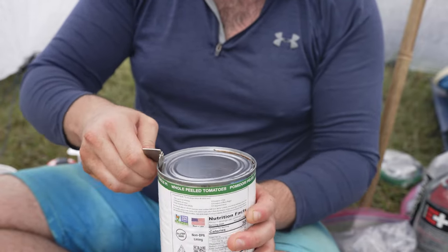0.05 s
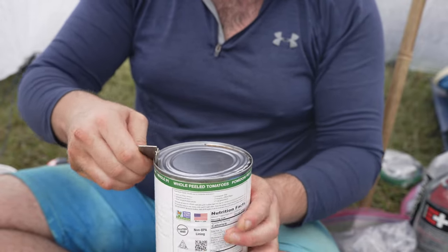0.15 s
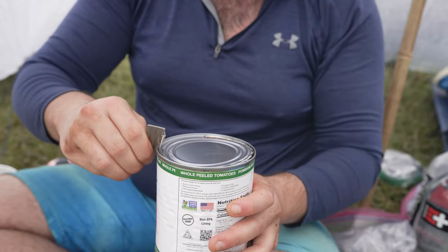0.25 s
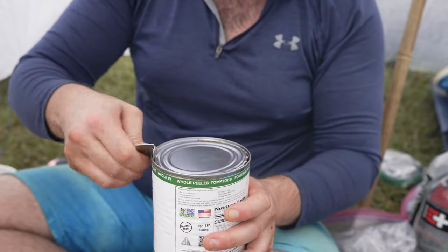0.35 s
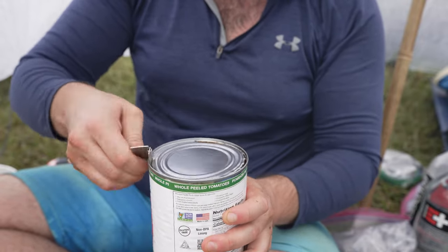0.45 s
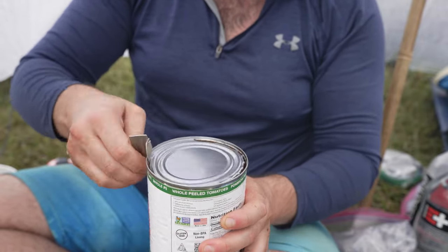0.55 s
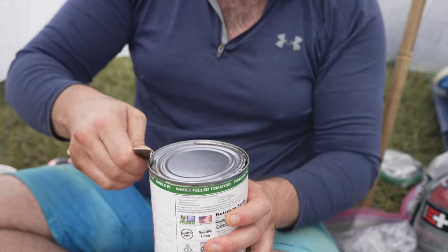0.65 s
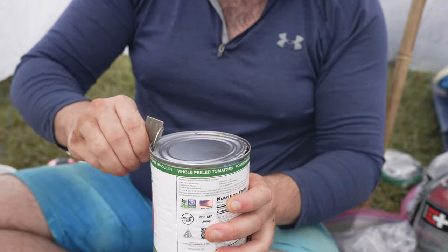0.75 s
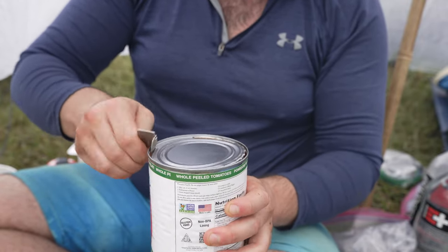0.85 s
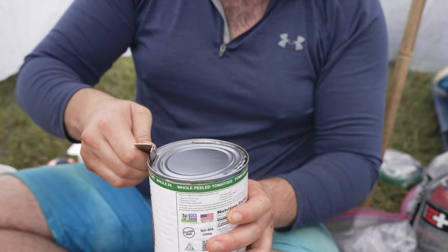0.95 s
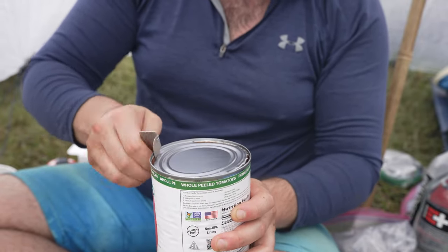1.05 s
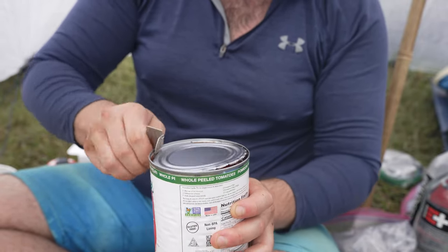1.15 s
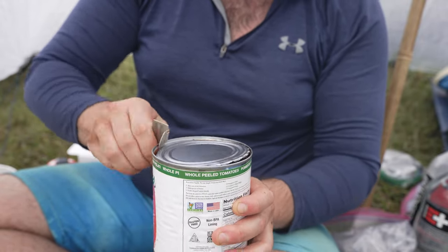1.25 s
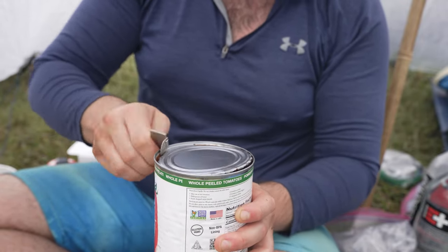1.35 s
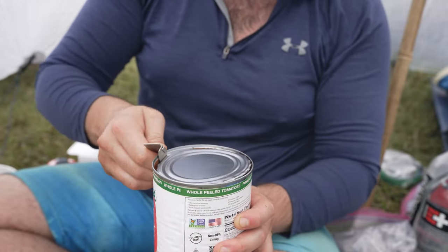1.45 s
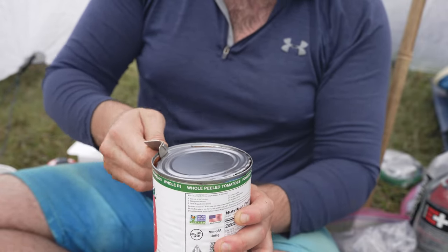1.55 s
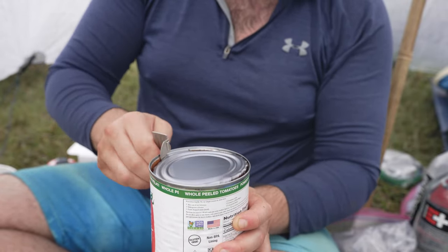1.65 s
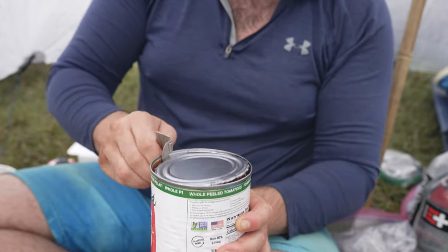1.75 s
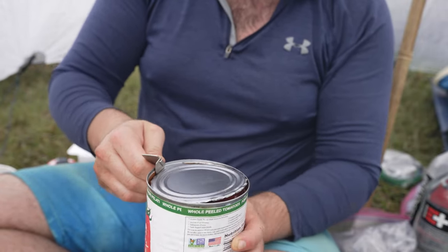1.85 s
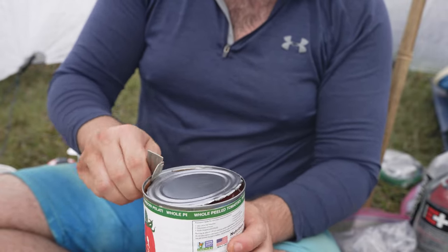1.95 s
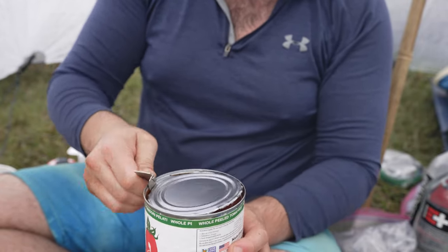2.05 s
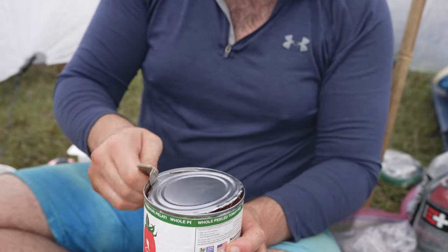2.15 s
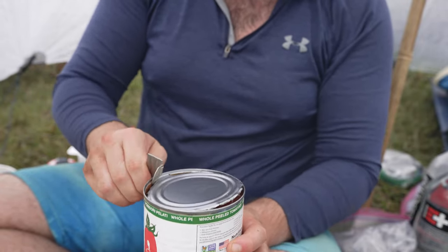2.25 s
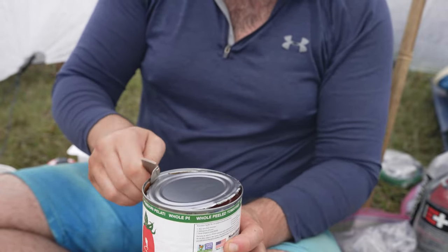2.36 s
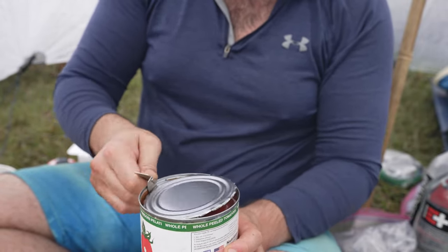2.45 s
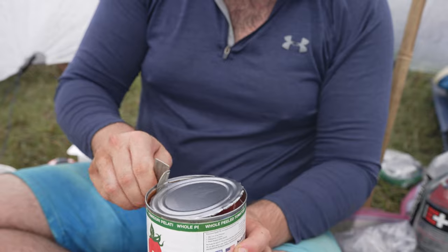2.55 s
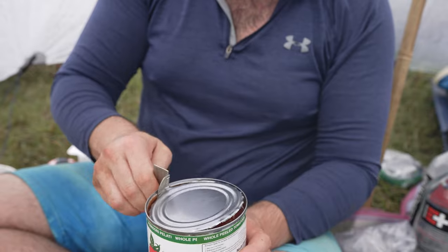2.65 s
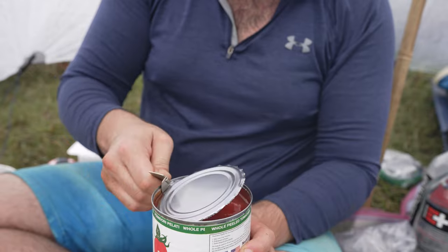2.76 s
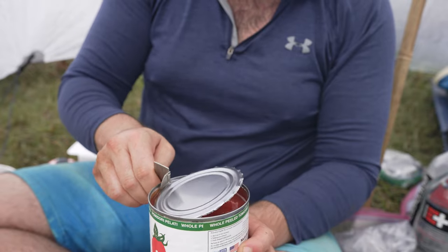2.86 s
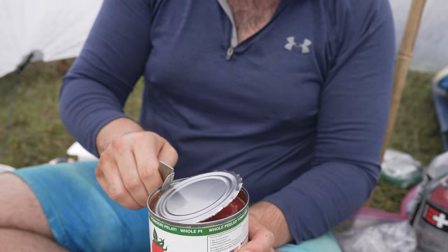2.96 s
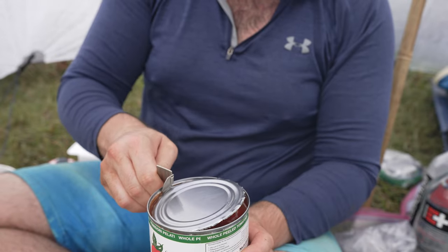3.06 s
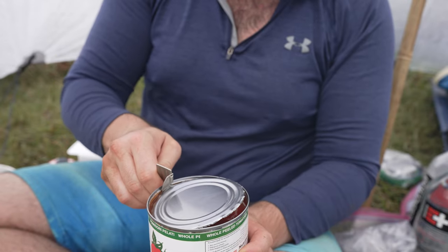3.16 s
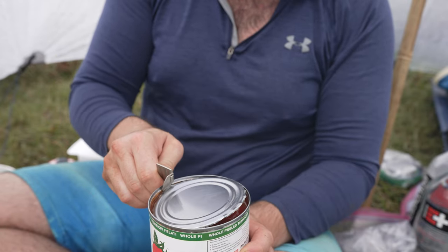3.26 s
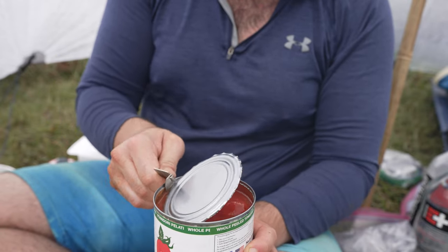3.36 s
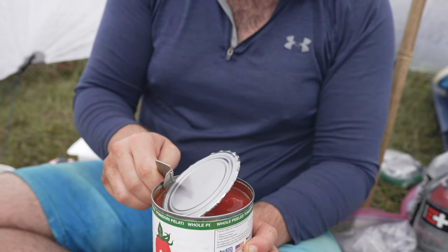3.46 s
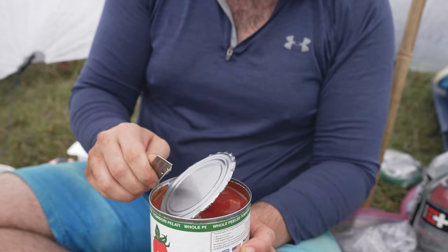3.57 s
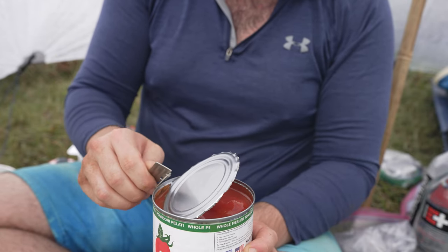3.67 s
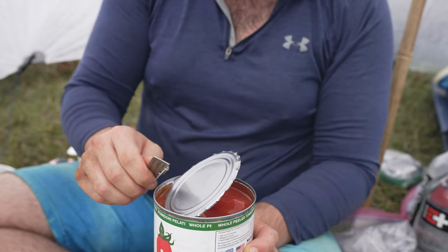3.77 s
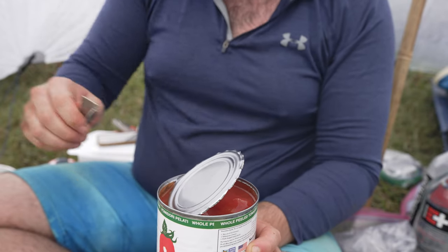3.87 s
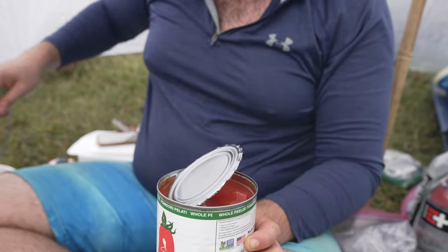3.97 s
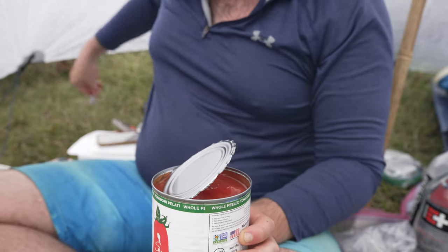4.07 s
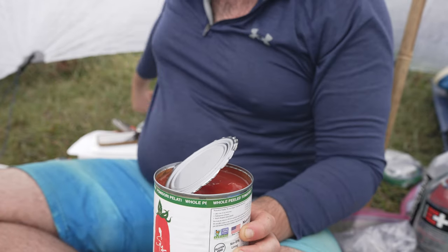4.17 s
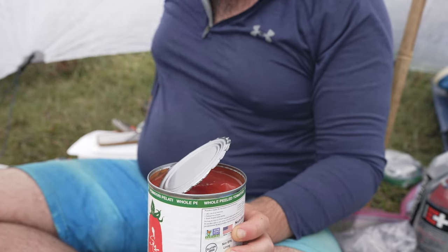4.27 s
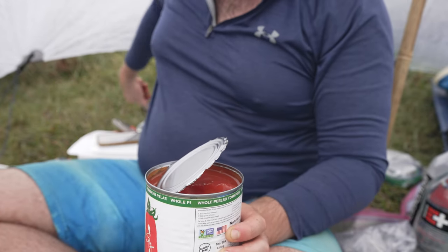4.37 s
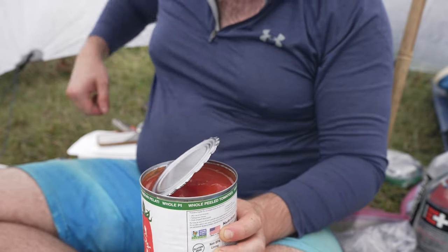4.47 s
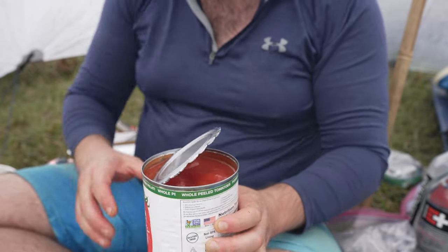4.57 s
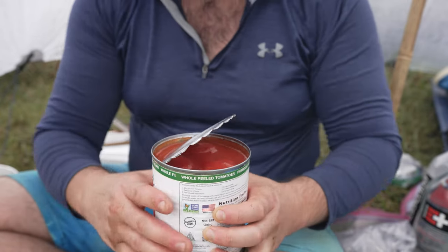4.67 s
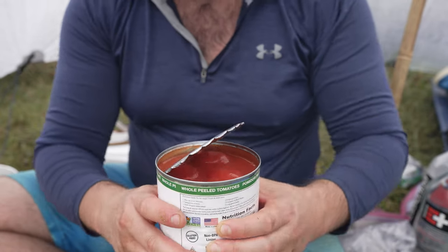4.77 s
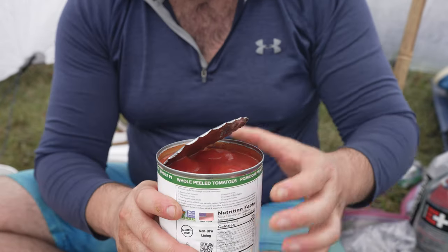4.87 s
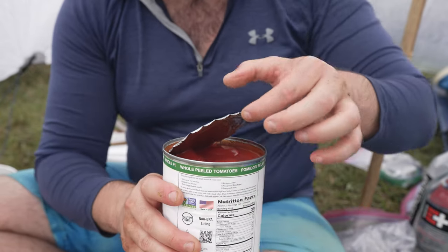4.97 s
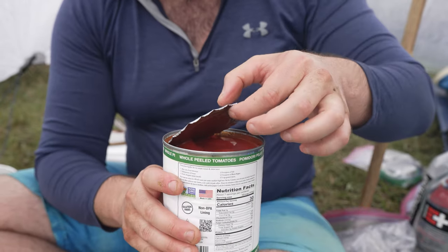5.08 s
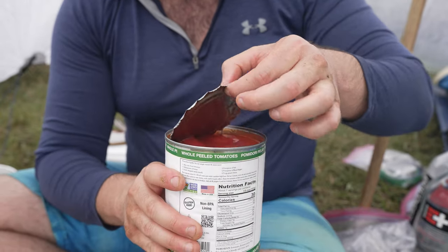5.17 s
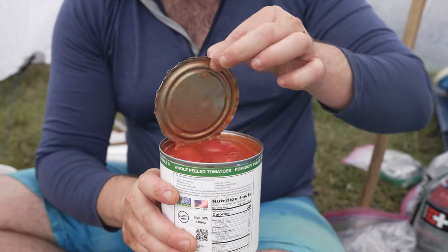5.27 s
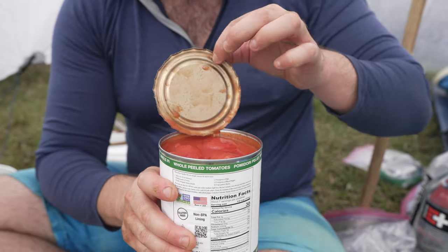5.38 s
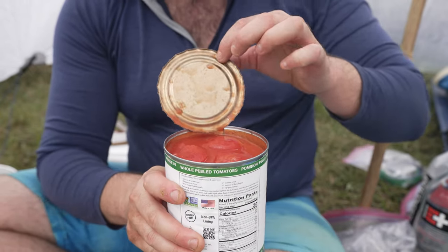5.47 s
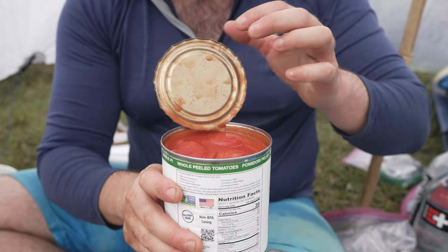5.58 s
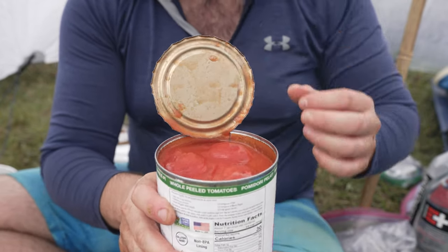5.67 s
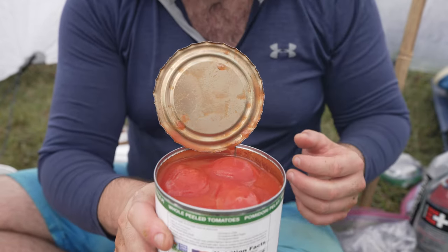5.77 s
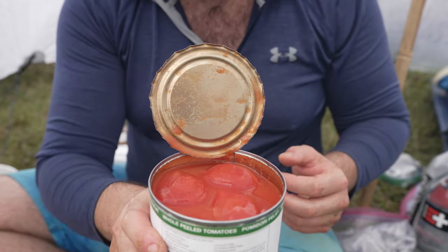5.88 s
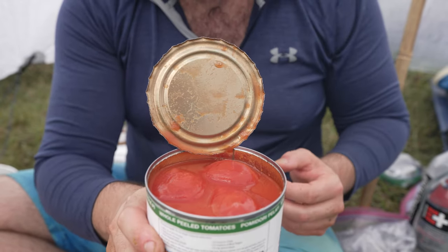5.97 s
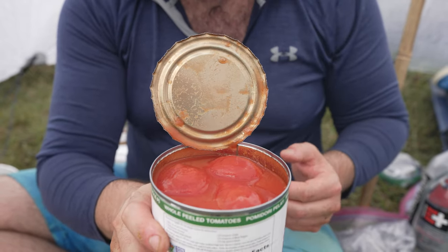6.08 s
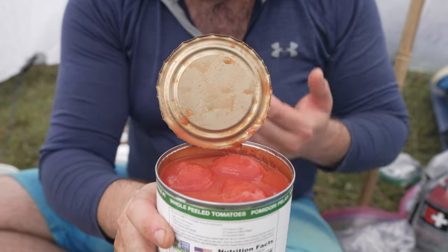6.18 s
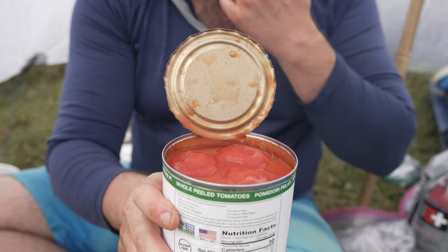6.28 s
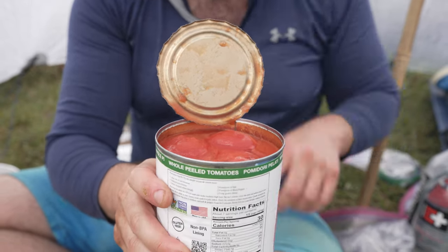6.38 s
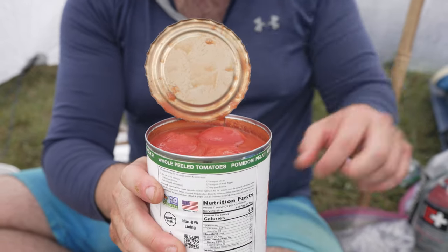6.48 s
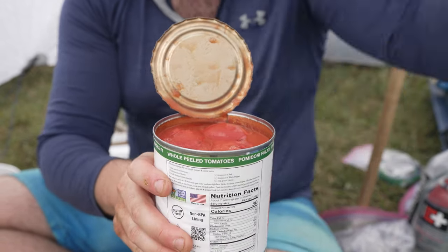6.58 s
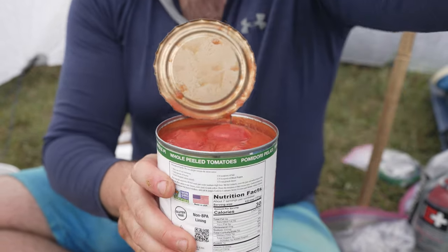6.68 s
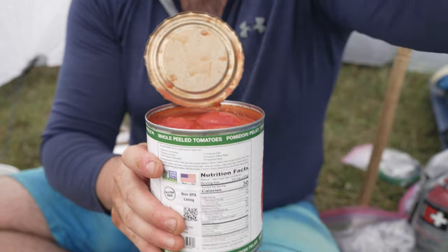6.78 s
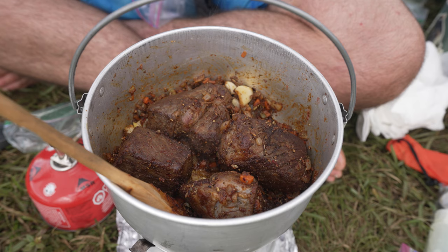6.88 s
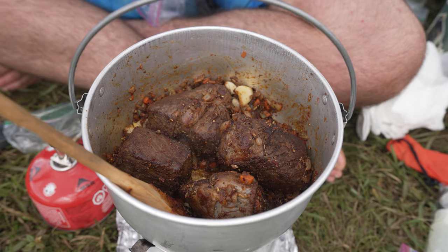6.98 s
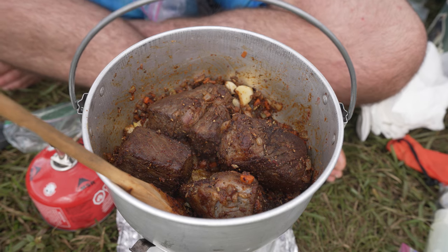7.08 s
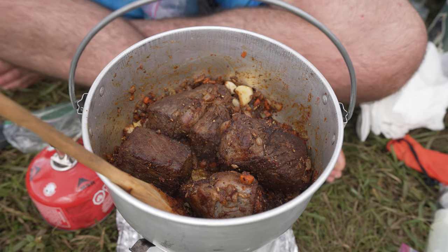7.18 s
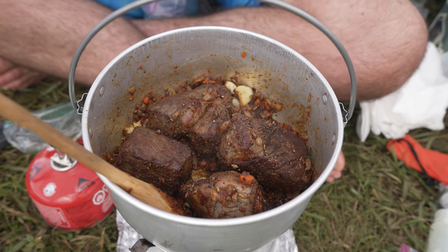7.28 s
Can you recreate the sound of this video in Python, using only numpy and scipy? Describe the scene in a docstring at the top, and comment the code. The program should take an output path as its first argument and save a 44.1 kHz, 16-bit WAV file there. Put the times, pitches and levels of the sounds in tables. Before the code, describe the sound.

Sharp metallic snaps and tearing scrapes open a tin can, followed by soft finger clicks, bursts of wind rumble, and an abrupt burner roar with sizzle.

```python
"""A folding opener works round the rim of a full steel can in a tent: ringing bites, tears and noisy slides of the blade.
The murk outside, a far engine drone and deep wind eddies on the microphone lie under it from the start.
Evenly repeated ticks end the cutting, sleeves rustle as grainy noise, the opener lands among gear in ringing bursts,
small clicks follow, fingers bend the ringing lid up, one is licked, and a knock sets the mount swinging as a low sine.
After a hard cut and a moment of silence, a burner roars in coloured noise under the sizzle and spits of a stew."""
import sys
import numpy as np
from scipy import signal
from scipy.fft import rfft, irfft
from scipy.io import wavfile
from scipy.ndimage import uniform_filter1d

SR = 44100
rng = np.random.default_rng(int(sys.argv[2]) if len(sys.argv) > 2 else 0)


def voltage_ratio(level):
    """Linear amplitude factor for a level in decibels (scalar or array-like)."""
    return 10 ** (np.asarray(level, float) / 20)


def inscribe(sig):
    """Save sig as 16-bit PCM at rate SR to the path in sys.argv[1].

    A 1-D sig is mono; a 2-D sig holds one channel per row.
    Samples are clipped to [-1, 1] before scaling.
    """
    pcm = np.round(np.clip(np.atleast_2d(sig).T, -1, 1) * 32767)
    wavfile.write(sys.argv[1], SR, pcm.astype(np.int16))


N = 323253
T = np.arange(N) / SR  # s
SPAN = 8192  # samples in the window of one blow

# blade snapping against the rim: [t/s, level/dB, fade/ms]
SNAPS = [(.0056, -33.5, 5.2), (.01, -37, 4.5), (0.0339, -29, 4.7), (0.0735, -50, 9.2), (0.1401, -32.5, 4.9),
         (0.2602, -54, 3), (0.3576, -43, 4.3), (0.41, -46, 11), (0.416, -48.5, 8), (.4564, -49.5, 5.6),
         (.508, -46.5, 2.2), (0.515, -43, 12), (.529, -35, 10.5), (.5597, -49, 1), (0.6047, -31.5, 0.67),
         (.634, -43, 1.3), (0.6707, -29, 1.4), (.7411, -40.5, 1.8), (0.8078, -43.5, 2),
         (0.8361, -33.5, 0.9), (0.8427, -32, 1.9), (0.9128, -41.5, 8), (1.0192, -44.5, 0.98),
         (1.0726, -48, .8), (1.1049, -22, 9.8), (1.1546, -32, 2.2), (1.1629, -29.5, .8),
         (1.2586, -43.5, 2.1), (1.2957, -36.5, 3.9), (1.3137, -41, 15), (1.334, -34, 1.2),
         (1.477, -42.5, 1.5), (1.573, -32, 9.6), (1.686, -43.5, 2.2), (1.692, -38, 1.5),
         (1.7019, -31.5, 5.8), (1.779, -44.5, 1.9), (1.804, -37, 2.6), (1.8606, -44, 4.3), (1.9, -51.5, .4),
         (2.054, -46.5, 2.2), (2.1725, -48.5, .6), (2.3118, -46, 3.4), (2.3287, -41.5, 6.7),
         (2.4824, -36, 0.94), (2.494, -40, 0.68), (2.5673, -51, 2.4), (2.737, -30.5, 0.7),
         (2.7445, -37.5, 5.3), (3.3375, -35.5, 0.98), (3.4765, -53.5, 2.9), (3.6044, -43.5, 1.7),
         (3.8017, -37, 0.39)]
# blade tearing through the steel: [t of the peak/s, level/dB, build-up/ms, fade/ms]
TEARS = [(0.3419, -26, 2.1, 0.86), (0.37, -31.5, 10.5, 2.6), (0.475, -32.5, 8.7, 3), (0.6774, -23, 3.5, 4),
         (.7618, -39.5, 6, 6.1), (0.783, -45, 5, 1.3), (0.8476, -23, 5.3, 4.9), (.974, -30, 8.2, 5.2),
         (1.0448, -44, 10, 8.8), (1.2023, -41, 12, 2.4), (1.2182, -29.5, 3.3, 6.6), (1.279, -49.5, 5.2, 22),
         (1.3075, -40, 11, 1.2), (1.3445, -30.5, 4.5, 7), (1.4207, -40.5, 6.6, 9.4), (1.455, -40, 2.8, 5.1),
         (1.466, -31, 10, 3.5), (1.535, -52.5, 1.4, 26), (1.562, -41, 2.9, 4.1), (1.7145, -32, 4, 2.2),
         (1.809, -37.5, 3.1, 3.7), (1.8177, -34, 2, 2.4), (2.067, -44, 19, 1.5), (2.2024, -38.5, 8.9, 3.4),
         (2.278, -50, 1.8, 4.7), (2.339, -37, 2.1, 2.7), (2.423, -54, 17, 1.4), (2.5924, -61.5, 11, 8.8),
         (2.786, -56, 12, 1.2), (2.876, -54, 4.2, 3), (3.6108, -41.5, 11, 1.6)]
# blade dragging between bites: [t/s, level/dB]
SCRAPE = [(0, -70), (.2, -76), (.28, -77.5), (1.0, -71), (1.3, -61), (1.38, -76), (2.0, -71), (2.3, -76),
          (2.7, -77), (3.05, -82.5), (3.9, -80)]
# blade sliding along the rim to its next hold: [start t/s, length/s, drive level before the rim colours it/dB]
SLIDES = [(0.073, 0.019, -58.5), (0.25, 0.073, -65.5), (0.41, 0.024, -54), (0.547, 0.041, -60),
          (0.898, 0.024, -56.5), (0.943, 0.017, -58.5), (1.029, 0.031, -56.5), (1.39, 0.03, -58),
          (1.476, .025, -56), (1.512, .05, -58.5), (1.632, .035, -56.5), (1.756, 0.035, -57.5),
          (1.936, 0.1, -61), (2.121, .035, -60), (2.263, 0.022, -57), (2.389, .04, -60),
          (2.452, 0.024, -67), (2.569, 0.041, -60), (2.739, 0.051, -57), (2.86, 0.04, -71.5),
          (3.371, .022, -67), (3.485, 0.023, -65.5), (3.593, 0.0096, -62)]
# evenly repeated ticks, the first two bright, as sped-up sound repeats fragments: [level/dB, fade/ms,
# treble/dB]
REPEATS = [(-41.5, 0.95, 18), (-41.5, .3, 17), (-43.5, 2.1, -1), (-33.5, 1.2, 2.5)]
# resonances of the can, before each contact's own mix and damping: [f/Hz, level/dB, t60/s]
CAN_MODES = [(1151, -11, .025), (1571, -9.5, .04), (2280, -5, 0.01), (2550, -9, 0.041), (3550, -4, .05),
             (3725, 5.5, 0.025), (4134, 12, 0.02), (4237, 3, 0.071), (4987, 1.5, .02), (5340, 6, 0.02),
             (6190, 7.5, 0.02), (6850, 2, 0.009), (8320, 4.5, 0.015), (9260, -6, 0.023), (10910, 1, 0.017),
             (12770, 2, 0.02), (13600, 2.5, .015), (15400, -5.5, .011)]
# pitch of the can as the lid comes free: [t/s, factor]
CAN_PITCH = [(0, 1.0), (1.8, 1.03), (2.9, 1.08)]
# ring left once the lid hangs loose, before the hand damps it: [t/s, share of t60]
LOOSE_LID = [(2.6, 0.93), (3.3, 0.55)]
# treble of the blade contacts before scatter: [t/s, level/dB]
CONTACT_TREBLE = [(0, -9.5), (.6, -15.5), (1.2, -13), (1.75, -3.5), (2.4, 0), (2.8, -5), (3.6, 6.5)]
# wind on the microphone, level of its upper eddies: [t/s, level/dB]
WIND = [(0, -77), (.9, -72), (1.05, -62), (1.3, -73.5), (2.9, -79), (3.05, -68.5), (3.7, -88), (5.28, -70),
        (5.45, -52.5), (5.68, -50.5), (5.8, -70.5), (5.92, -44), (6.0, -56), (6.35, -77), (6.47, -60),
        (6.7, -73.5), (6.76, -54.5)]
# the mount swinging after a knock: [t/s, f/Hz, level/dB]
MOUNT_SWING = [(6.73, 41, -74), (6.812, 38.1, -36), (6.9, 40, -31.5)]
# tone of the murk outside: [f/Hz, relative level/dB]
FIELD_TONE = [(59, -30.5), (100, -5), (308, -3), (335, -3), (558, -4), (1420, -32), (1580, -21.5),
              (2130, -33), (12100, -41.5), (16000, -41.5)]
# sleeves and hands moving: [t of the peak/s, level/dB, swell/s, fade/s]
RUSTLES = [(4.05, -75, .15, 0.17), (4.632, -71, 0.091, 0.14), (5.6, -89, 0.099, 0.33),
           (6.46, -67.5, 0.034, 0.081), (6.7, -76, 0.12, .08)]
# opener landing among gear: [t/s, level/dB, build-up/ms, fade/ms]
DROP = [(4.3136, -25.5, 1.2, 6.8), (4.33, -40, .7, 2.1), (4.3354, -24.5, .4, 4.1),
        (4.3421, -20.5, 2.3, 7.5), (4.3629, -40.5, 8.2, 8.5)]
# resonances of the gear, before each hit's own mix and damping: [f/Hz, level/dB, t60/s]
GEAR_MODES = [(1700, 4, 0.005), (2420, -6.5, 0.025), (3572, -2, 0.019), (4250, 2.5, 0.014),
              (4900, 2.5, 0.016), (5400, -6, 0.02), (9520, -1, 0.013), (12400, -3.5, 0.012)]
# small clicks and knocks of fingers, lips, gear and the mount: [t/s, level/dB, fade/ms, centre f/Hz]
CLICKS = [(4.8818, -48.5, 0.21, 8300), (5.1034, -59, 1.5, 3280), (5.158, -62.5, 6.5, 3500),
          (5.241, -61, .6, 1750), (5.252, -48, 9.4, 249), (5.695, -67, 1, 1990), (6.2133, -53, 1.85, 3480),
          (6.2816, -47.5, 0.1, 6400), (6.347, -55.5, 0.36, 11990), (6.4408, -61.5, 2.6, 4070),
          (6.482, -51.5, .25, 4400), (6.5137, -60, 3.2, 4900), (6.74, -42.5, 9.6, 111),
          (6.808, -51, 3.2, 347), (6.8582, -47, 0.83, 396), (6.8711, -51, 2.6, 5300)]
# fingers on the lid: [t/s, level/dB, fade/ms, treble/dB, f of the mode woken most/Hz]
LID_TOUCHES = [(5.2516, -34, 2.1, -0.5, 900), (5.256, -36, 2.2, 3, 2970), (5.4496, -53.5, 4.7, -12.5, 3450),
               (5.549, -65, 1.4, -25, 1450), (5.559, -51.5, 7.6, -29, 1820)]
# resonances of the lid, before each touch's own mix and damping: [f/Hz, level/dB, t60/s]
LID_MODES = [(900, 1.5, 0.012), (1450, 11, 0.016), (1820, -13, 0.1), (3007, -9, 0.089), (3450, -6.5, 0.018),
             (4400, 5, 0.022), (5300, 2, 0.011), (7200, -2.5, 0.027), (9160, 5.5, 0.01085)]
# tone of burner and stew: [f/Hz, relative level/dB]
STEW_TONE = [(24, -30), (40, -10), (54, -4), (199, 3.5), (231, -2), (455, -3), (1410, -15), (7000, -14),
             (16000, -22)]
# fat spitting in the pot: [t/s, level/dB, centre f/Hz]
SPITS = [(6.9603, -44, 3440), (6.9766, -47, 6100), (7.0171, -41, 7800), (7.2839, -43, 5400)]

SNAP_RISE_MS = 0.5
REPEATS_S, REPEAT_GAP_S = 3.7056, 0.0428  # first tick, spacing
ECHO_S, ECHO_DB, ECHO_RISE_MS = 0.014, -14.5, 10  # delay, level against its tick, swell
STRAYS, STRAY_FADE_MS = 45, 2.5  # count, mean fade
STRAY_OVER_DRAG_DB, STRAY_SCATTER_DB = 7, 6
CUT_OUT_S, CUT_IN_S = 6.899, 6.9167


def curve(rows, column=1):
    """One column of a table, drawn out sample by sample."""
    return np.interp(T, *np.transpose(rows)[[0, column]])


def columns(*cols):
    """Rows from columns; single numbers are repeated."""
    return np.transpose(np.broadcast_arrays(*cols))


def unit(x):
    """Scales a sound to rms 1."""
    return x / np.sqrt(np.mean(x ** 2))


def colour(x, points):
    """Filters by (Hz, dB) points along log frequency and scales to rms 1."""
    hz, db = np.transpose(points)
    f = np.arange(len(x) // 2 + 1) * SR / len(x) + 1
    gain = voltage_ratio(np.interp(np.log(f), np.log(hz), db))
    return unit(irfft(rfft(x) * gain, len(x)))


def walk(rate):
    """Random levels of rms 1, each held 1 / rate s and slewed into the next."""
    hold = int(SR / rate)
    levels = np.repeat(rng.standard_normal(N // hold + 1), hold)
    return unit(uniform_filter1d(levels, hold)[:N])


def grit(shape, spread_db):
    """Noise whose grains have a long but bounded tail of sizes."""
    steps = np.minimum(rng.exponential(size=shape), 6)
    return rng.standard_normal(shape) * voltage_ratio(spread_db * steps)


def ringing(modes, gain, pitch, free):
    """Frequency response of decaying modes, one row for each blow; a grip shortens them."""
    hz, db, t60 = np.transpose(modes)
    decay = np.log(1000) / (free[:, None] * t60 * SR)
    pole = np.exp(2j * np.pi * pitch[:, None] * hz / SR - decay)
    z = np.exp(-2j * np.pi * np.arange(SPAN // 2 + 1) / SPAN)
    weight = gain * voltage_ratio(db)
    return sum(weight[:, k, None] / (1 - pole[:, k, None] * z) for k in range(len(hz)))


def blows(rows, response, spread_db):
    """Bursts of grains that build up and fade by 10 dB in the given times, rung through a response each."""
    rows = np.asarray(rows, float)
    ms = (np.arange(SPAN) - SPAN // 4) * 1000 / SR
    rise = np.maximum(-ms, 0) / np.maximum(rows[:, 2:3], 0.05)
    rise = rise + 8 * np.maximum(rise - 1, 0)  # contact begins abruptly
    fade = (np.maximum(ms, 0) / np.maximum(rows[:, 3:4], 0.05)) ** 1.24
    grains = grit(rise.shape, spread_db) * voltage_ratio(-10 * (rise + fade))
    sound = irfft(rfft(grains) * response, SPAN)
    peak = np.sqrt(uniform_filter1d(sound ** 2, size=66).max(axis=1))  # loudest 1.5 ms
    out = np.zeros(N + 2 * SPAN)
    for row, burst, top in zip(rows, sound, peak):
        start = int(row[0] * SR) + SPAN - SPAN // 4
        out[start:start + SPAN] += burst * voltage_ratio(row[1]) / top
    return out[SPAN:SPAN + N]


def metal(rows, modes, lows_db, crack_db, spread_db, thin_hz, pitch=1., free=1., favour_db=0):
    """Each contact wakes the modes in its own mix over a toneless crack; lows and treble follow the contact."""
    rows = np.asarray(rows, float)
    chance = rng.standard_normal((len(rows), 2, len(modes)))
    gain = voltage_ratio(4 * chance[:, 0] + favour_db) * np.sign(chance[:, 1])
    detune = 1 + 0.009 * chance[:, 1, 0]
    free = np.clip(free + np.zeros(len(rows)), 0.05, 1)
    body = ringing(modes, gain, pitch * detune, free) + voltage_ratio(np.reshape(crack_db, (-1, 1)))
    f = np.arange(SPAN // 2 + 1) * SR / SPAN
    low = 1 / (1 + (f / 3000) ** 8)
    high = 1 / (1 + (7500 / (f + 1)) ** 8)
    thin = 1 / (1 + (thin_hz / (f + 1)) ** 3)  # small things radiate little bass
    bands = [thin * low, 1 - low - high, high]
    levels = [np.reshape(lows_db, (-1, 1)), 0, rows[:, 4:5]]
    response = 0
    for band, db in zip(bands, levels):
        part = band * body
        response = response + voltage_ratio(db) * part / np.linalg.norm(part, axis=1, keepdims=True)
    return blows(rows, response, spread_db)


def repeats():
    """Ticks 43 ms apart, as sped-up sound repeats fragments, each with a weaker, slowly swelling echo."""
    db, fade, bright = np.transpose(REPEATS)
    s = REPEATS_S + REPEAT_GAP_S * np.arange(len(db))
    ticks = columns(s, db, SNAP_RISE_MS / 2, fade, bright)
    echoes = columns(s + ECHO_S, db + ECHO_DB, ECHO_RISE_MS, fade, np.mean(bright))
    return np.vstack([ticks, echoes])


def contacts():
    """Touches of blade and can, then the repeats, as rows (s, dB, build-up ms, fade ms, treble dB)."""
    s, db, fade = np.transpose(SNAPS)
    snaps = columns(s, db, SNAP_RISE_MS, fade)
    # stray small contacts follow the level of the drag
    luck = rng.random((STRAYS, 3))
    when = luck[:, 0] * SCRAPE[-1][0]
    drag_db = np.interp(when, *np.transpose(SCRAPE))
    size = drag_db + STRAY_OVER_DRAG_DB + STRAY_SCATTER_DB * (2 * luck[:, 1] - 1)
    strays = columns(when, size, SNAP_RISE_MS, -STRAY_FADE_MS * np.log(1 - luck[:, 2]))
    rows = np.vstack([snaps, TEARS, strays])
    treble = np.interp(rows[:, 0], *np.transpose(CONTACT_TREBLE))
    treble = treble + 2 * rng.standard_normal(len(rows))  # dB of scatter
    return np.vstack([np.c_[rows, treble], repeats()])


def bites():
    """Snaps, tears, strays and repeats ring the can, each damped differently by the hand."""
    rows = contacts()
    s, treble_db = rows.T[[0, 4]]
    grip = rng.uniform(0.6, 1, len(s))
    # brighter contacts also gain lows, and crack more than they ring
    return metal(rows, CAN_MODES, lows_db=-11.5 + 0.43 * treble_db, crack_db=31 + 0.2 * treble_db,
                 spread_db=3.5, thin_hz=700, pitch=np.interp(s, *np.transpose(CAN_PITCH)),
                 free=np.interp(s, *np.transpose(LOOSE_LID)) * grip)


def drag(can):
    """Fine ticks of tearing steel excite the can between bites."""
    tearing = grit(N, 4) * voltage_ratio(3 * walk(45))
    rung = signal.fftconvolve(tearing, irfft(can + voltage_ratio(38.5), SPAN))[:N]
    rung = colour(rung, [(500, -28.5), (1200, 13.5), (4000, 2), (16000, -11.0)])
    return rung * voltage_ratio(curve(SCRAPE)) * (T < SCRAPE[-1][0])


def slides(can):
    """The edge catches and slips along the rim, as uneven grains rung through the can."""
    strokes = 0
    for start, length, db in SLIDES:
        to_edge = np.minimum(T - start, start + length - T)
        strokes = strokes + voltage_ratio(db) * np.clip(to_edge / 0.006 + 0.5, 0, 1)
    catches = unit(grit(N, 5) * voltage_ratio(5 * walk(250)))
    rim = irfft(can + voltage_ratio(24), SPAN)
    rung = signal.fftconvolve(catches * strokes, rim / np.linalg.norm(rim))[:N]
    return signal.sosfilt(signal.butter(2, 1500, "high", fs=SR, output="sos"), rung)


def opener():
    """Bites and tears on the rim, with the blade sliding and dragging unevenly between them."""
    can = ringing(CAN_MODES, np.ones((1, len(CAN_MODES))), np.array([1.01]), np.array([0.6]))[0]
    return bites() + slides(can) + drag(can)


def wind():
    """Deep, lumpy eddies on the microphone: two bands of low noise, the upper one gusting."""
    shut = [(1500, -120)]  # nothing left above
    deep = colour(rng.standard_normal(N), [(12, -27.5), (25, 16.5), (60, 18.5), (90, -44)] + shut)
    gusts = rng.standard_normal(N) * voltage_ratio(4.2 * walk(25))
    upper = colour(gusts, [(50, -42), (75, 4), (150, -6.0), (350, -30.5)] + shut)
    return (voltage_ratio(2.0) * deep + upper) * voltage_ratio(curve(WIND))


def field():
    """Distant murk of wind and land through the tent wall, as wavering coloured noise."""
    return voltage_ratio(-67 + 2.0 * walk(0.8)) * colour(rng.standard_normal(N), FIELD_TONE)


def engine_drone():
    """Faint far engine: harmonics 3 to 5 of 140.3 Hz, each coming and going by itself."""
    harmonics = sum(voltage_ratio(2.3 * walk(2.9)) * np.sin(2 * np.pi * k * 140.3 * T) for k in range(3, 6))
    return voltage_ratio(-83) * harmonics


def cloth():
    """Fine uneven grains of fabric and skin; each move swells and fades by 10 dB in its times."""
    grains = grit(N, 2.5) * voltage_ratio(1.5 * walk(30))
    rub = colour(grains, [(600, 3.5), (1500, -0.5), (5000, -5.0), (16000, -9.5)])
    moves = voltage_ratio(-80.5)  # constant floor of the rubbing
    for s, db, swell, fade in RUSTLES:
        moves = moves + voltage_ratio(db - 10 * np.maximum((s - T) / swell, (T - s) / fade))
    return rub * moves * (T > 3.9)


def gear_drop():
    """The opener lands among gear: short damped rings over a toneless crack."""
    rows = columns(*np.transpose(DROP), -5)  # treble dB
    return metal(rows, GEAR_MODES, lows_db=-16, crack_db=28, spread_db=-0.5, thin_hz=900, free=0.69)


def clicks(s, db, fade_ms, centre, octaves):
    """Short toneless ticks: grains through a bell-shaped band round a centre pitch."""
    f = np.arange(SPAN // 2 + 1) * SR / SPAN + 1
    band = np.exp(-(np.log2(f / centre[:, None]) / octaves) ** 2)
    return blows(columns(s, db, 0.11, fade_ms), band, spread_db=-2)


def lid():
    """Fingers bend the lid up; the place of the finger favours one mode, softer touches keep to the middle."""
    s, db, fade, treble_db, woken = np.transpose(LID_TOUCHES)
    near = np.abs(np.transpose(LID_MODES)[0] / woken[:, None] - 1) < 0.12
    # the grip leaves 0.73 of the ring
    return metal(columns(s, db, 0.78, fade, treble_db), LID_MODES, lows_db=1.0 + 0.16 * treble_db,
                 crack_db=25.0, spread_db=3.0, thin_hz=399, free=0.73, favour_db=16 * near)


def mount_swing():
    """The knocked mount swings at a low, gliding pitch, as a sine of changing level."""
    since = np.maximum(T - MOUNT_SWING[0][0], 0)
    phase = 2 * np.pi * np.cumsum(curve(MOUNT_SWING) * (since > 0)) / SR
    level = np.sqrt(2) * voltage_ratio(curve(MOUNT_SWING, column=2))  # table levels are rms
    return level * np.sin(phase) * np.clip(since / 0.03, 0, 1)


def stew():
    """Burner roar and dense sizzle with spits of fat; a slow sway of air pressure settles under it."""
    roar = colour(rng.standard_normal(N), STEW_TONE)
    sizzle = colour(grit(N, 10.0), [(900, -21.0), (3000, -3.0), (16000, 2.0)])
    fry = voltage_ratio(-50 + 1.0 * walk(11)) * (roar + voltage_ratio(-11.5) * sizzle)
    t = np.maximum(T - CUT_IN_S, 0)
    sway = (0.0053 + 0.017 * np.exp(-t / 0.071)) * np.cos(2 * np.pi * 11.3 * t)
    s, db, centre = np.transpose(SPITS)
    return fry + sway + clicks(s, db, 0.4, centre, octaves=1.5)


def scene():
    """The tent up to the cut, a gap, then the pot."""
    tent = opener() + wind() + field() + engine_drone() + cloth() + gear_drop()
    tent = tent + clicks(*np.transpose(CLICKS), octaves=1.09) + lid() + mount_swing()
    until_cut = np.clip((CUT_OUT_S - T) / 0.0034 + 0.5, 0, 1)
    return (tent * until_cut + stew() * (T > CUT_IN_S))[None]


def low_pass(x):
    """Removes everything above the highest recorded frequency."""
    return signal.sosfilt(signal.butter(12, 16810, fs=SR, output="sos"), x)


def record(dry):
    """The microphone loses the very top, by a steep low-pass."""
    top = signal.butter(8, 15900, fs=SR, output="sos")
    mix = signal.sosfilt(top, dry)
    return low_pass(mix)


dry = scene()
out = record(dry)
inscribe(out)
```